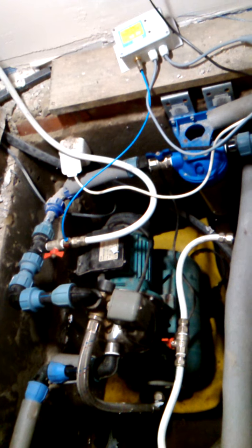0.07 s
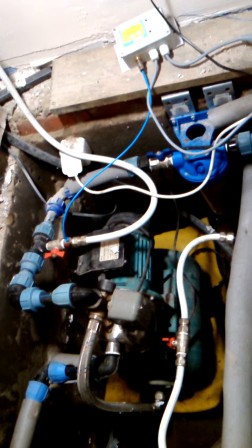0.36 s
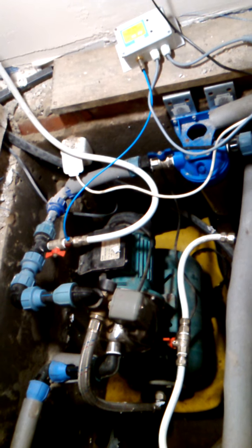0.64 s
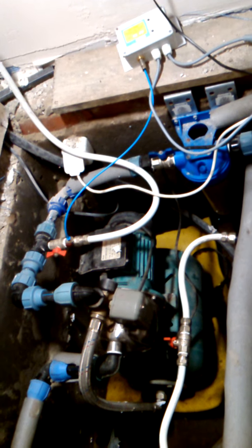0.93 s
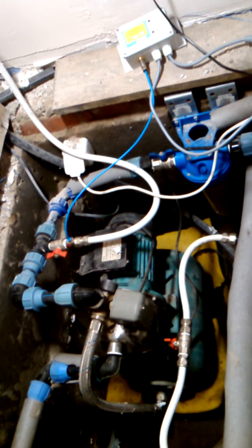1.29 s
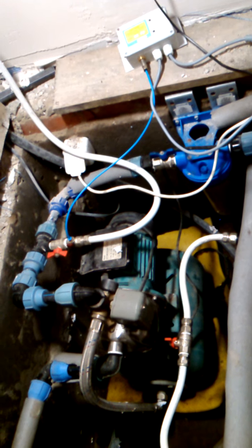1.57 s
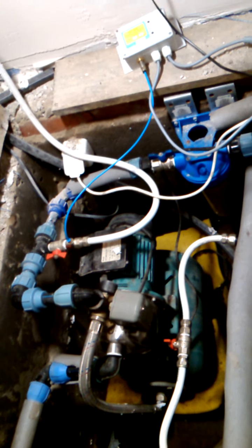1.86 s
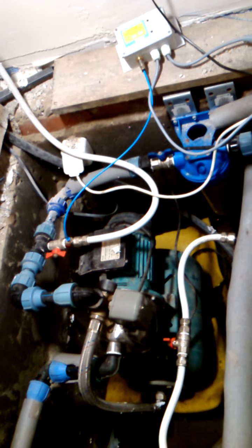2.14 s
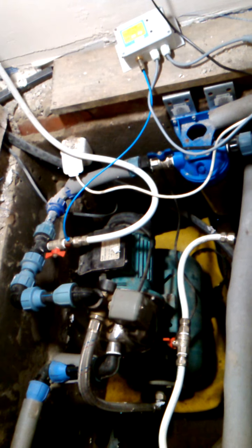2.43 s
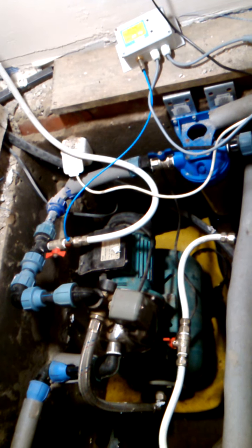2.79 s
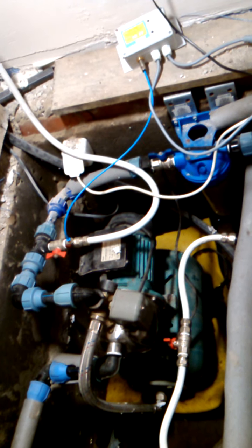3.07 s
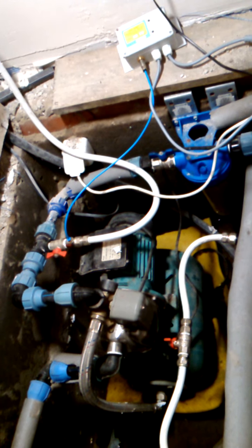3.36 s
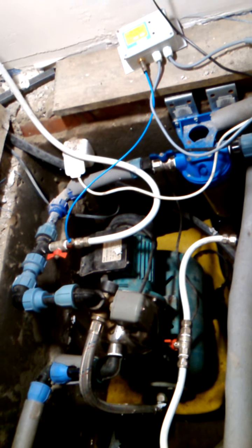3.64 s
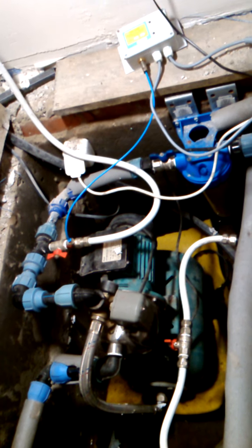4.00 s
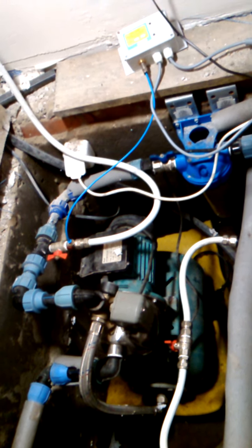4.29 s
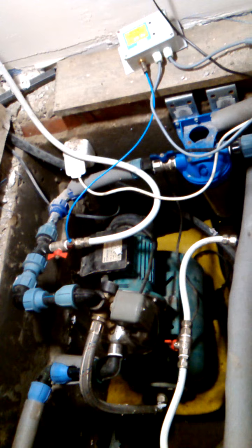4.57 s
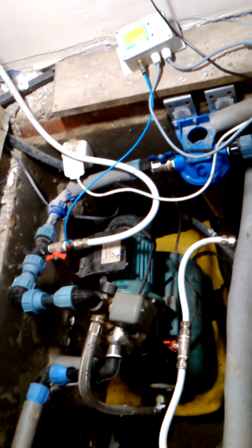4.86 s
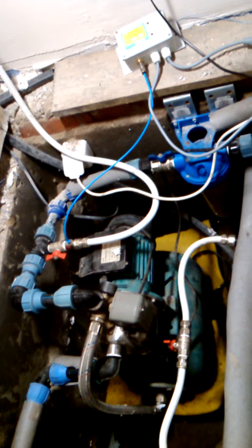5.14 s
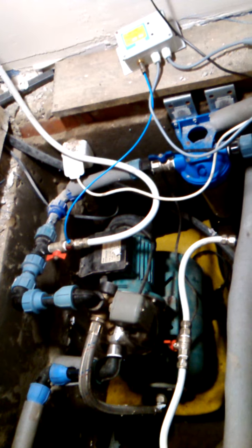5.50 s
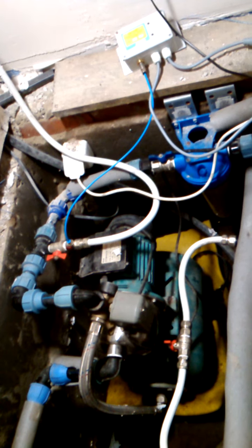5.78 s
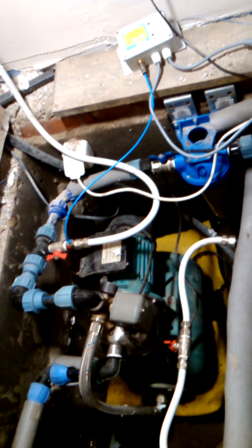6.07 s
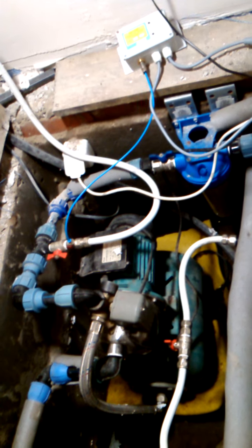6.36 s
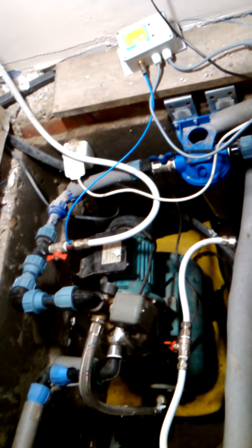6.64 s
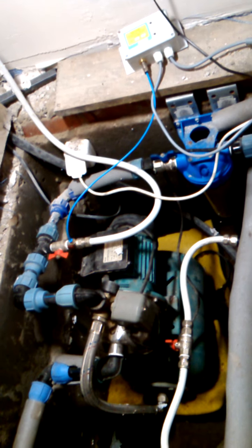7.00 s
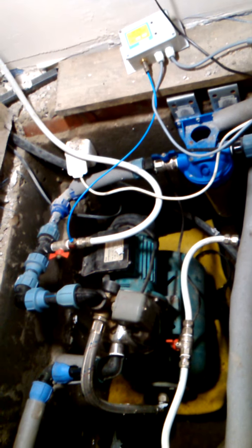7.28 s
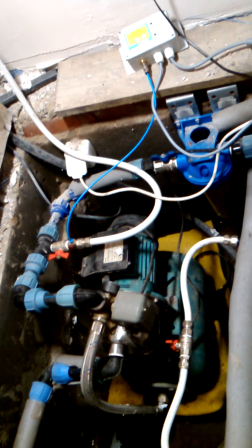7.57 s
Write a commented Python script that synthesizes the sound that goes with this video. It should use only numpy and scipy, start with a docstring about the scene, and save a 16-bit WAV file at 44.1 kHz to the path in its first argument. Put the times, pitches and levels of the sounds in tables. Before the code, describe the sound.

Close by in a concrete pump pit, water rushes loudly through a whirring electric pump. Gurgles and small glugs come through as the motor strains and hums harder. The whirr falls in pitch and the rush fades, followed by a short valve hiss and a few faint ticking spurts. After some last softly ringing turns the pump stops, leaving only a steady mains hum.

```python
"""An electric water pump runs flat out in a concrete pit: turbulent water rushes through the casing,
the vanes sound a tone and the rubbing rotor rings the housing. As back pressure builds the pump labours:
the magnetic hum swells, trapped air gurgles and bubbles glug. The shaft slows, the flow fails in a few
gushes, and a valve hisses, shuts and spurts. The last slow turns ring the housing one by one; the rotor
scrapes to rest and, with the current still on, a steady mains buzz remains."""
import sys
import numpy as np
from scipy import signal
from scipy.fft import rfft, irfft
from scipy.io import wavfile

SR = 44100
rng = np.random.default_rng(int(sys.argv[2]) if len(sys.argv) > 2 else 0)


def digitize_waveform(pressure):
    """Quantize a signal to 16-bit integers and store it at the path in sys.argv[1].

    Rows of a 2-D input are taken as channels; values are limited to [-1, 1].
    """
    field = np.atleast_2d(pressure).T
    bounded = np.clip(field, -1, 1)
    quanta = np.round(bounded * 32767).astype(np.int16)
    wavfile.write(sys.argv[1], SR, quanta)


N = 340893
T = np.arange(N) / SR
HZ = np.maximum(np.fft.rfftfreq(N, 1 / SR), 1)

# Shaft speed: t/s, speed/(turns/s)
SHAFT_SPEED = [(0, 46.7), (2, 46.5), (2.5, 46), (3, 44.9), (3.5, 42.7), (3.8, 39.5), (4, 37), (4.2, 33.8),
               (4.5, 27.5), (5, 17.5), (5.45, 10.5), (5.68, 7.1), (5.86, 4.7), (6.1, 2.2), (6.27, 0)]
# Flow through the pump, as the relative level of its rush: t/s, level/dB
FLOW_LEVEL = [(0, -25), (1.05, -25.5), (1.48, -26), (1.73, -24.5), (2.78, -27), (2.9, -30), (3.35, -32),
              (3.95, -34.5), (4.25, -36.5), (4.5, -41), (4.74, -48), (4.82, -53.5), (5.2, -64.5),
              (5.5, -75)]
# Last gushes of the failing flow: t/s, level above the flow/dB
GUSHES = [(4.29, 1), (4.37, 2.5), (4.5, 1.6)]
# Strain on the motor as back pressure builds and lets go: t/s, level/dB
MOTOR_STRAIN = [(0, -32), (2, -17), (2.5, -9), (3, -3), (3.5, -1.5), (4, -2), (4.5, -6), (5.5, -24),
                (5.95, -30), (6.3, -43)]
# Spectrum of rushing water: f/Hz, level/dB
RUSH_SPECTRUM = [(600, -23), (850, -18), (1300, -11.5), (1600, -2.5), (1850, -3.5), (2300, -3.5),
                 (2900, -0.5), (3800, -3), (5000, -1.16), (6800, 0.5), (7800, -1.5), (9500, -12),
                 (12000, -20), (15500, -23)]
# Narrow peaks and dips of the casing and pipes: f/Hz, width/Hz, level/dB
PIPE_PEAKS = [(1432, 35, -6.5), (1436, 185, 8), (1480, 26, -13.5), (1590, 56, -10), (1708, 59, -4),
              (1780, 54, 1), (2585, 50, 4), (2594, 35, -4), (2750, 83, 5), (2815, 106, -10.5),
              (3475, 15, 4.5), (3855, 27, 7.5), (4180, 21, 4.5), (4180, 12, 2), (4540, 35, 5),
              (4200, 44.4, 5.5), (4460, 260, -2.5), (4820, 180, 1), (5250, 22, 1), (5220, 27, 8),
              (6005, 21.5, -7), (6060, 22, 0), (6840, 86, -1), (6520, 260, -2.5), (6675, 77, 4.5),
              (7740, 44.2, 7.5), (7980, 62.5, -9.5), (8400, 67, 1.5)]
# Resonances of the valve's narrowing throat: f/Hz, width/Hz, level/dB
THROAT_MODES = [(3680, 570, -4), (2320, 99, -2)]
# Pipe resonances that the vane tone falls through: f/Hz, width/Hz, level/dB
VANE_PEAKS = [(257, 8.8, 12), (225.2, 19, 20)]
# Spectrum of water churning in the casing: f/Hz, level/dB
CHURN_SPECTRUM = [(30, -25), (80, -13), (120, -13), (155, -5), (175, -3.5), (235, 7), (340, 1), (430, -8),
                  (480, 2), (515, -11.5), (570, 2), (700, 2), (850, 0.5), (1100, -20.5)]
# Low, middle and high modes of the housing, and the stator's mode: f/Hz, width/Hz, level/dB
LOW_MODES = [(920, 21, 4.5), (988, 32.5, -3.5)]
MID_MODES = [(1134, 91, 9.5), (1173, 95, 8)]
HIGH_MODES = [(1861, 160, -1.5), (2061, 78, 6), (2164, 91, 4), (2603, 31, -9.5), (4126, 91, 1.5)]
STATOR_MODES = [(4060, 78, 0)]
# Excitation of those four groups, a row each: level from full flow/dB, level from full-speed rubbing/dB,
# exponent of speed, swing in a slow turn/dB, waver/dB, level of the last scrape/dB
MODE_DRIVE = [(-39, -41, .6, 4.5, 1.2, -70), (-35, -48, 1.1, 0.5, 1, -68),
              (-33.5, -41, 1.43, 0.5, 1.5, -72), (-58, -46, 3.6, 4.5, 2.0, -90)]
# Magnetic hum of the motor running free, strained and stalled: harmonic number, level/dB
RUNNING_HUM = [(1, -64.5), (2, -51), (3, -63.5)]
STRAINED_HUM = [(1, -55.5), (3, -40.5), (4, -46.5), (6, -35.5), (7, -58.5), (8, -51.5), (9, -42),
                (10, -45.5), (11, -44), (13, -49.5), (41, -45)]
STALLED_HUM = [(1, -80.5), (2, -50), (3, -54.5), (4, -70), (5, -79.5), (6, -63), (7, -71.5), (8, -74),
               (9, -58), (10, -64.5), (11, -69.5), (12, -75.2), (13, -76.5), (14, -80.5), (15, -84),
               (16, -79.5), (17, -81), (18, -78), (19, -75.5), (20, -84.5), (21, -79.5), (22, -85),
               (23, -87.5), (24, -79.5), (25, -82.5), (26, -76.5), (27, -85.5), (38, -78), (39, -87),
               (40, -79.5), (41, -66.5), (42, -99.5), (46, -88), (53, -87.3)]
# Spectrum of still air in the pit: f/Hz, level/dB
AIR_SPECTRUM = [(30, 17), (60, 10.5), (230, 11), (350, 5.5), (900, 9), (1500, 2), (5000, 3.5), (6000, 0),
                (7300, 4.5), (9000, -.5), (15500, -3)]
# Single air bubbles passing through: t/s, f/Hz, level/dB
BUBBLES = [(1.84, 2140, -33), (2.025, 905, -30), (2.075, 2170, -32), (2.295, 911, -25), (2.55, 894, -33),
           (2.61, 2260, -29), (2.665, 960, -25.5), (4.05, 1180, -36), (4.141, 1170, -34),
           (4.288, 2295, -34.5)]
# Spectrum of water squeezing through the valve: f/Hz, level/dB
SEEP_SPECTRUM = [(5000, -32), (6400, -14), (7000, 14), (7800, 11), (9200, 8.5), (11000, -10), (15500, -20)]
# Spurts through the shut valve: t/s, hiss level/dB, tick level/dB
SPURTS = [(5.139, -57, -66), (5.168, -65, -54), (5.441, -62, -61)]
# Spectrum of the tick that starts a spurt: f/Hz, level/dB
TICK_SPECTRUM = [(2000, -15), (5000, 1), (9000, -1), (15500, 3)]

FULL_SPEED, FULL_FLOW_DB = SHAFT_SPEED[0][1], -25.5
PULL_HZ = 99.98   # magnetic pull, twice the supply frequency


def from_db(db):
    """Amplitude grows tenfold for every 20 dB."""
    return 10 ** (np.asarray(db) / 20)


def rms_one(x):
    """Division by the root mean square gives unit power."""
    return x / np.sqrt(np.mean(x ** 2) + 1e-20)


def in_time(rows):
    """Linear interpolation turns timed points into a continuous curve."""
    return np.interp(T, *np.transpose(rows))


def speed_db(speed):
    """Speed as a level relative to full speed, so that a power law becomes a product."""
    return 20 * np.log10(speed / FULL_SPEED + 1e-6)


def swell(at_s, half_s):
    """A Gaussian envelope rises to 1 and falls again."""
    return np.exp(-np.minimum(((T - at_s) / half_s) ** 2, 50))


def white():
    """Independent random samples have a flat spectrum."""
    return rng.standard_normal(N)


def drift(rate_hz):
    """Low-pass filtered noise fluctuates smoothly, with unit spread."""
    step, settle = 40, 2000
    pole = np.exp(-2 * np.pi * rate_hz * step / SR)
    noise = rng.standard_normal(N // step + settle + 2)
    slow = signal.lfilter([1], [1, -2 * pole, pole * pole], noise)[settle:]
    return np.interp(np.arange(N) / step, np.arange(len(slow)), rms_one(slow))


def peak_db(hz, peaks):
    """Each resonance adds a bell-shaped peak or dip to the level."""
    return sum(db / (1 + (2 * (hz - centre) / width) ** 2) for centre, width, db in peaks)


def colour(x, spectrum, peaks=()):
    """Linear filtering imposes a smooth spectrum with narrow peaks on it; unit power."""
    hz, db = np.transpose(spectrum)
    gain_db = np.interp(np.log(HZ), np.log(hz), db) + peak_db(HZ, peaks)
    return rms_one(irfft(rfft(x) * from_db(gain_db), N))


def resonate(x, modes):
    """Modal superposition: steep-sided resonances respond in parallel; unit power."""
    response = 0
    for hz, width, db in modes:
        detuning = (HZ / hz - hz / HZ) * hz / (np.pi / 2 * width)
        response = response + from_db(db) / (1 + 1j * detuning) ** 2
    return rms_one(irfft(rfft(x) * response, N))


def pit(x, t60_s=.25):
    """Interference: dense echoes from close walls comb the spectrum finely."""
    t = T[:SR // 4]
    echoes = rng.standard_normal(len(t)) * from_db(-60 * t / t60_s)
    return x + .33 * signal.fftconvolve(x, echoes / np.linalg.norm(echoes))[:N]


def water(angle, flow_db, pressure_db, body_db=-21, spray_db=-31.5, spray_above_hz=9000):
    """Turbulence, throbbing slightly with the shaft, excites resonances of casing, pipes and throat."""
    turbulence = pit(white() * from_db(.5 * drift(39.4) + .13 * np.cos(angle)))
    rush = colour(turbulence, RUSH_SPECTRUM, PIPE_PEAKS)
    treble = irfft(rfft(rush) / (1 + (spray_above_hz / HZ) ** 8), N)
    throat_ring = resonate(colour(white(), RUSH_SPECTRUM, PIPE_PEAKS), THROAT_MODES)
    throat = from_db(-4.5 + .84 * pressure_db) * throat_ring
    body = from_db(body_db + flow_db) * (rush - treble + throat)
    spray = from_db(spray_db + 1.16 * flow_db) * rms_one(treble)   # dies faster than the body
    surge = from_db(.63 * drift(4.1))
    return (body + spray) * surge


def impeller(speed, angle, strain_db, vanes=6):
    """Periodic forcing: passing vanes, motor slots and unbalance give tones that sink with the speed."""
    slowed_db = speed_db(speed)
    fade_db = 3 * (speed - FULL_SPEED)   # the finer tones need full speed
    pull_phase = 2 * np.pi * PULL_HZ * T
    vane = (-50 + 7.3 * slowed_db + peak_db(vanes * speed, VANE_PEAKS), vanes * angle)
    overtone = (-56 + fade_db, 2 * vanes * angle)
    sideband = (-55 + fade_db, vanes * angle + 2 * pull_phase)
    slot = (-40.5 + .46 * strain_db + fade_db, 6 * pull_phase + angle)
    partials = (vane, overtone, sideband, slot)
    tones = sum(from_db(db) * np.sin(phase + .5 * drift(8)) for db, phase in partials)
    unbalance = from_db(-58 + 2.5 * slowed_db) * np.sin(angle)
    return np.sqrt(2) * (tones + unbalance)


def churn(speed, full_speed_db=-45.5):
    """Turbulence in the stirred casing makes low noise, weaker and lumpier as the shaft slows."""
    slowed_db = speed_db(speed)
    lumps_db = 2 * (1 - from_db(slowed_db) ** 2) * drift(4.2)
    return from_db(full_speed_db + 1.14 * slowed_db + lumps_db) * colour(white(), CHURN_SPECTRUM)


def housing(speed, angle, flow_db):
    """Flow and seal friction excite the modes; drag peaks at one spot, so slow turns stand out."""
    slow = 1 / (1 + (speed / 11) ** 4)
    last_scrape = swell(at_s=6.19, half_s=.075)
    out = 0
    for row, modes in zip(MODE_DRIVE, (LOW_MODES, MID_MODES, HIGH_MODES, STATOR_MODES)):
        water_db, rub_db, exponent, swing_db, waver_db, scrape_db = row
        drag = from_db(rub_db + exponent * speed_db(speed) + slow * swing_db * (np.cos(angle) - 3.5))
        friction = drag + from_db(scrape_db) * last_scrape
        drive = np.hypot(from_db(water_db + flow_db), friction)   # the two add in power
        out = out + drive * from_db(waver_db * drift(6.5)) * resonate(white(), modes)
    return out


def hum(speed, angle, strain_db, wobble_centre_hz=800, whine_above_hz=3000):
    """Pulsing magnetic pull shakes the iron; the off-centre rotor modulates the middle harmonics."""
    phases = 1.2 * rng.standard_normal(64)
    turning = np.tanh(speed)
    slow = 1 / (1 + (speed / 12) ** 2)
    turn_swing = turning * (.26 + .3 * slow) * np.cos(angle)
    pole_swing = turning * slow * .2 * (1 + np.cos(2 * angle))   # a swell as each of two poles passes
    running = from_db(2.5) * (1 - 1 / (1 + (speed / 36) ** 6.3))   # fades below 36 turns/s
    strained = from_db(strain_db)
    stalled = 1 / (1 + (speed / 16) ** 3.1)   # takes over below 16 turns/s
    whine = from_db(-5 * turning)   # weaker until the rotor stands still
    out = 0
    for level, harmonics in ((running, RUNNING_HUM), (strained, STRAINED_HUM), (stalled, STALLED_HUM)):
        for k, db in harmonics:
            hz = k * PULL_HZ
            swing = pole_swing if k == 2 else turn_swing / (1 + np.log2(hz / wobble_centre_hz) ** 2)
            gain = from_db(db) * (whine if hz > whine_above_hz else 1)
            out = out + level * gain * (1 + swing) * np.cos(2 * np.pi * hz * T + phases[k])
    return np.sqrt(2) * out


def still_air(level_db=-64.5):
    """Stationary noise: the faint background of the air in the pit."""
    return from_db(level_db) * colour(white(), AIR_SPECTRUM)


def gurgle(flow_db, strain_db, rest_hz=803, squeeze_hz=458.3, wander_hz=30, width_hz=50):
    """Turbulence excites the resonance of a trapped air pocket, whose pitch rises under pressure."""
    hz = rest_hz + squeeze_hz * from_db(strain_db) + wander_hz * drift(8.04)
    phase = 2 * np.pi * np.cumsum(hz) / SR
    narrow_noise = drift(width_hz) * np.cos(phase) + drift(width_hz) * np.sin(phase)
    return from_db(-28 + flow_db + strain_db) * narrow_noise


def glugs(rise_per_s=.33):
    """Bubble resonance: each passing bubble rings briefly on an unsteady, slightly rising note."""
    wobble = .54 * drift(45)
    out = 0
    for at_s, hz, db in BUBBLES:
        age = T - at_s
        phase = 2 * np.pi * hz * age * (1 + rise_per_s * age / 2)
        out = out + from_db(db) * swell(at_s, half_s=.016) * np.sin(phase + wobble)
    return np.sqrt(2) * out


def valve(peak_s=4.72, shut_s=5.025, rise_db_per_s=31, shut_t60_s=.18, spurt_t60_s=.17, tick_t60_s=.1):
    """Flow noise: the last water sputters through the valve until it shuts; ticking spurts follow."""
    rise_db = -rise_db_per_s * np.maximum(peak_s - T, 0)
    shut_db = -60 * np.maximum(T - shut_s, 0) / shut_t60_s
    sputter_db = 3 * drift(35)
    hiss = from_db(-51.5 + rise_db + shut_db + sputter_db)
    ticks = 0
    for at_s, hiss_db, tick_db in SPURTS:
        hiss = hiss + (T > at_s) * from_db(hiss_db - 60 * np.abs(T - at_s) / spurt_t60_s)
        ticks = ticks + (T > at_s) * from_db(tick_db - 60 * np.abs(T - at_s) / tick_t60_s)
    return hiss * colour(white(), SEEP_SPECTRUM) + ticks * colour(white(), TICK_SPECTRUM)


def scene(tight_spot_s=5.975, drain_db_per_s=35):
    """Superposition: the sounds of water, motor and air add, alike in both channels."""
    speed, strain_db = in_time(SHAFT_SPEED), in_time(MOTOR_STRAIN)
    gush_db = sum(db * swell(at_s, half_s=.025) for at_s, db in GUSHES)
    drained_db = drain_db_per_s * np.maximum(T - FLOW_LEVEL[-1][0], 0)
    flow_db = in_time(FLOW_LEVEL) - FULL_FLOW_DB + gush_db - drained_db
    pressure_db = strain_db + 1.4 * gush_db
    angle = 2 * np.pi * np.cumsum(speed) / SR
    angle -= np.interp(tight_spot_s, T, angle)   # zero where the rotor rubs hardest
    mix = water(angle, flow_db, pressure_db) + impeller(speed, angle, strain_db) + churn(speed)
    mix += housing(speed, angle, flow_db) + hum(speed, angle, strain_db) + still_air()
    mix += gurgle(flow_db, strain_db) + glugs() + valve()
    return np.tile(mix, (2, 1))


def record(dry):
    """Band limiting: a steep low-pass filter removes the treble above 15.8 kHz."""
    return signal.sosfilt(signal.ellip(12, .1, 80, 15800, fs=SR, output="sos"), dry)


dry = scene()
out = record(dry)
digitize_waveform(out)
```